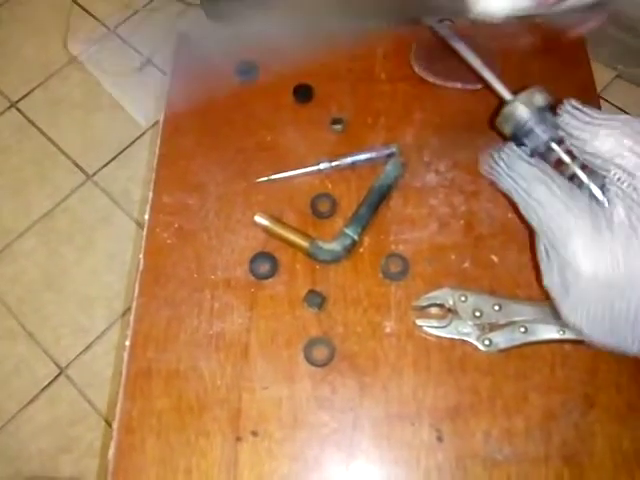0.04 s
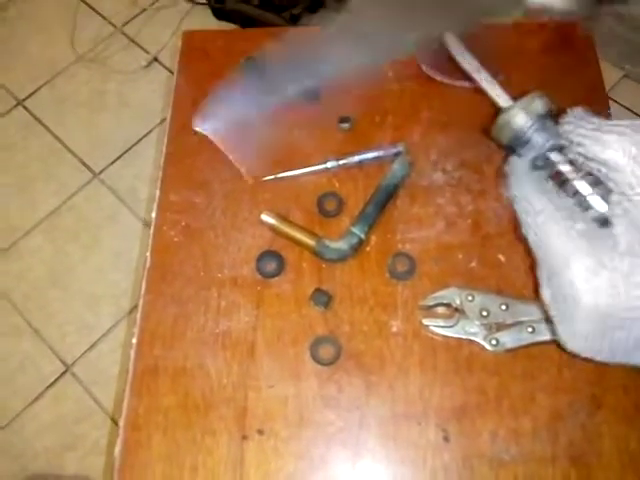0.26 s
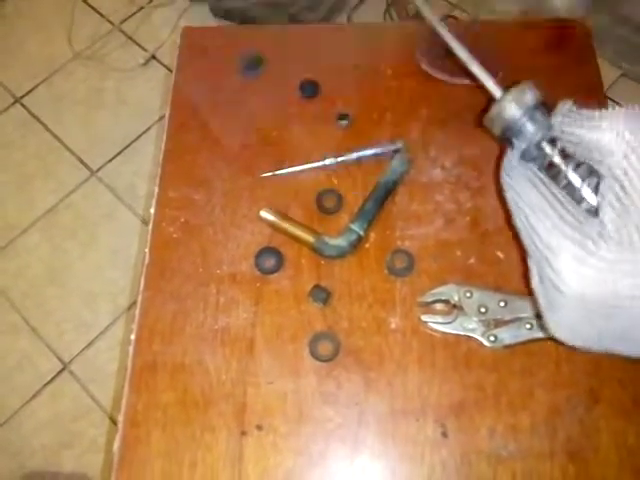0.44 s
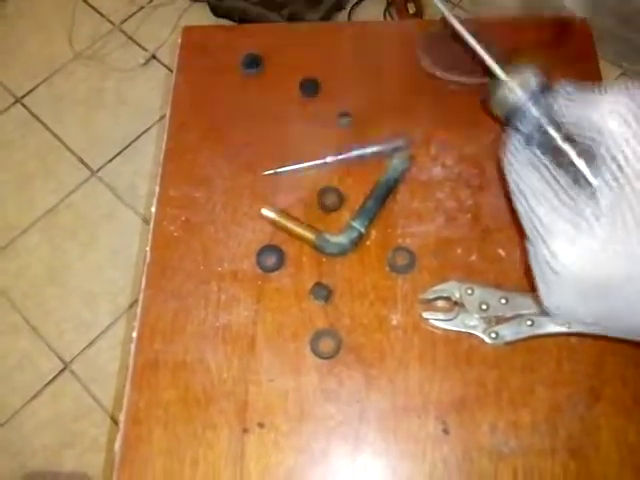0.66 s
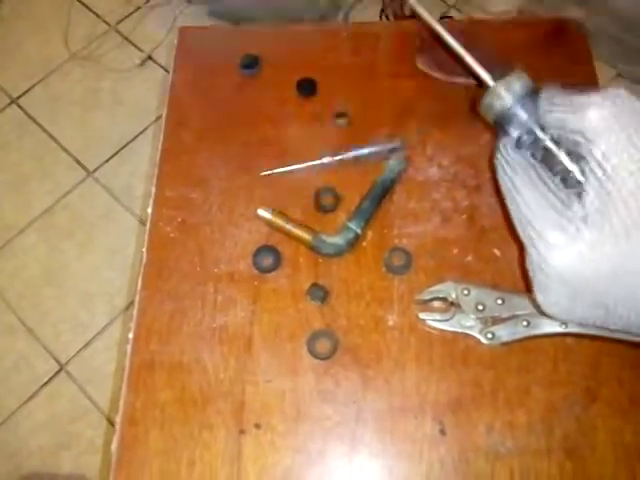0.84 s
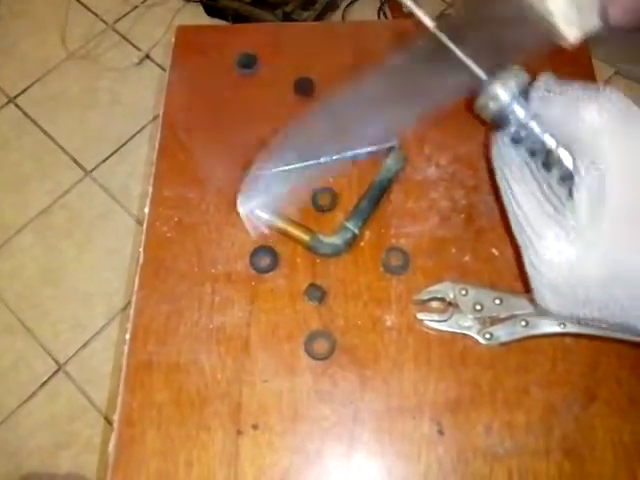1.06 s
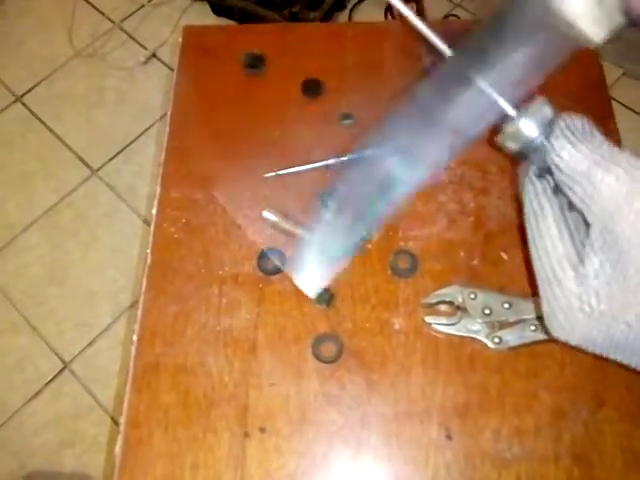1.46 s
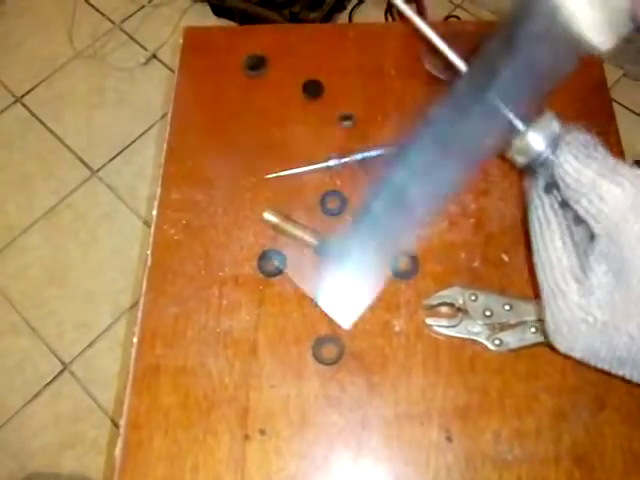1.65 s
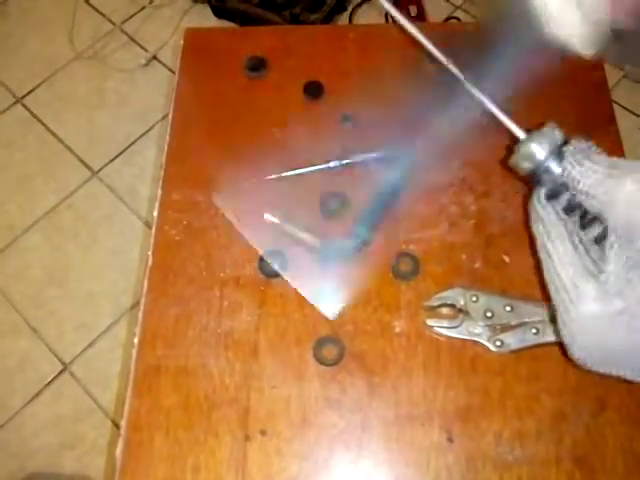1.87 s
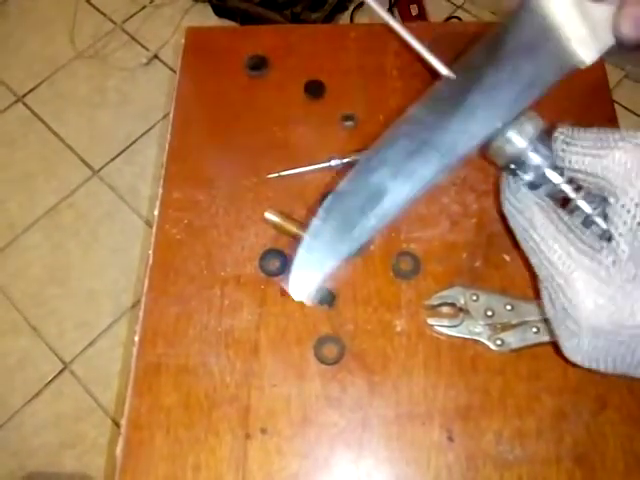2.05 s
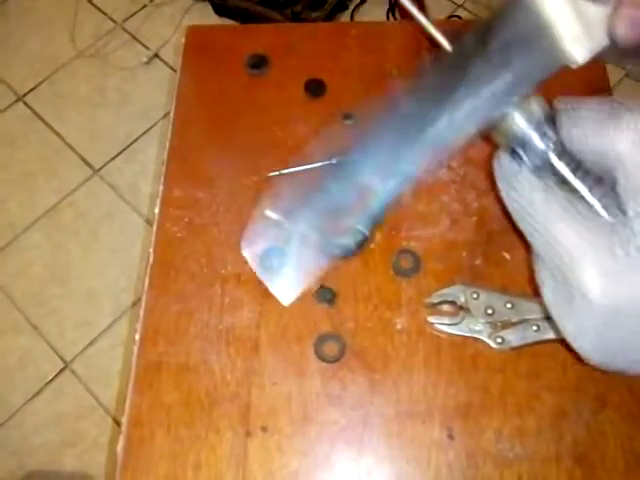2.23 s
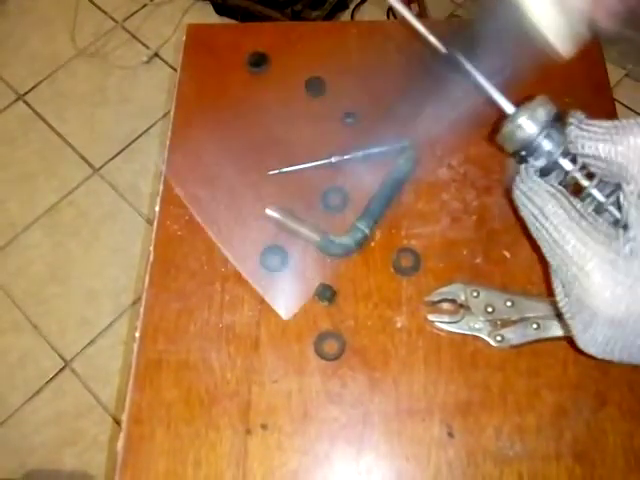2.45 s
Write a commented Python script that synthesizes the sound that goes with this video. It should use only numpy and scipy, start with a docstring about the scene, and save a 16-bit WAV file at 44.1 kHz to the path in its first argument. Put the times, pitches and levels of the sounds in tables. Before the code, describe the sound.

A metal blade scrapes back and forth along a steel rod in quick, bright, uneven strokes, starting softly at 0.1 seconds. The rasps carry ticks, faint squeaks and slight ringing, often ending in a knock. Hard clacks land at about 0.8 and 2.1 seconds, with a lighter one at 1.5, each briefly echoing in the hard-walled workshop. The strokes stop around 2.3 seconds, leaving a quiet background.

```python
"""A hard-walled workshop, one microphone: a long blade sweeps back and forth along a hand-held steel rod.
Each pass is a rasp of tiny slips through the blade's resonances, with faint squeaks, ticks where the
edge catches and often a knock at its end; light grazes leave the rod ringing. The table top reflects
the sound ahead of the room's tail, over a quiet background. The hardest clacks drive the recorder's
limiter down, so the room swells up after them."""
import sys
import numpy as np
from scipy import signal
from scipy.fft import rfft, irfft
from scipy.io import wavfile
from scipy.ndimage import uniform_filter1d, minimum_filter1d

SR = 44100
rng = np.random.default_rng(int(sys.argv[2]) if len(sys.argv) > 2 else 0)


def put_to_file(sound):
    """Save the sound as 16-bit audio at rate SR, in the file named by the first command-line argument."""
    columns = np.atleast_2d(sound).T  # one column per channel
    safe = np.clip(columns, -1, 1)
    whole_steps = np.round(safe * 32767)
    wavfile.write(sys.argv[1], SR, whole_steps.astype(np.int16))


N = 114660

# the blade's resonances: pitch_hz, height_db (against its colour), t60_s
BLADE_MODES = [(1880, 3, .1), (2805, -3, 0.048), (3090, -0.5, 0.03), (3757, 1, 0.023), (4020, 2, 0.036),
               (5310, -2, 0.056), (6120, 5.5, 0.023), (7030, 3.5, 0.045)]


def scrape(start_s, end_s, start_db, end_db, attack_s, slips_per_s=3900, release_s=.0024):
    """One pass: tiny slips, bunched by chatter, excite the blade as the contact slides along it."""
    t = np.arange(SR // 6) / SR
    length_s = max(end_s - start_s, .004)
    slips = (rng.random(len(t)) < slips_per_s / SR) * rng.choice([-1, 1], len(t))
    slips = slips * amp(3.5 * rng.standard_normal(len(t)).clip(-2, 2))  # uneven in strength
    slips *= amp(1.5 * wander(len(t), .0043 * SR))  # chatter
    slips *= amp(-1) / np.sqrt(np.mean(slips[t < length_s] ** 2) + 1e-9)
    contact = np.minimum(t / attack_s, 1) * np.exp(-np.maximum(t - length_s, 0) / release_s)
    pressure = contact * amp(np.interp(t, [0, length_s], [start_db, end_db]))
    force = slips * pressure
    travel = np.pi / 2 * np.minimum(t / length_s, 1)  # crossfade between two points of contact
    sound = signal.fftconvolve(force * np.cos(travel), blade_response(start_db))
    sound += signal.fftconvolve(force * np.sin(travel), blade_response(end_db))
    add(sound, 0, pressure * squeak(len(t)))
    return sound


def blade_response(level_db, neutral_db=-34.5, brightest_db=-22):
    """The blade's response at one point of contact; more pressure is brighter, up to a limit."""
    # the scraped blade's colour: frequency_hz, level_db
    blade_colour = [(100, -29), (800, -31.5), (1200, -22.5), (2200, -21), (3200, -11.5), (4000, -8.5),
                    (4450, -16), (5100, -5), (5800, -7), (6400, 0.5), (7250, -3.5), (8000, -13.5),
                    (8700, -16), (10000, -24), (13200, -29.5), (14100, -22.5), (14700, -19.5), (15500, -12)]
    tilt = .2545 * (min(level_db, brightest_db) - neutral_db)
    return ring(blade_colour, BLADE_MODES, ripple_db=3, tilt_db_per_octave=tilt)


def squeak(count, change_s=.012):
    """The slips lock into short, unsteady squeaks near the blade's resonances."""
    # squeak notes: pitch_hz, level_db (against the rasp)
    notes = [(3720, -16), (5310, -15), (6220, -8), (7030, -9)]
    sound = np.zeros(count)
    for hz, db in notes:
        gain = amp(db + 5 * wander(count, change_s * SR).clip(-2, 1.5))
        pitch_hz = hz * (1 + .012 * wander(count, 2 * change_s * SR))
        sound += gain * np.sin(2 * np.pi * np.cumsum(pitch_hz) / SR)
    return sound


def graze():
    """A light graze leaves the rod ringing freely, a little different each time."""
    # the rod's bending modes: pitch_hz, level_db, t60_s
    rod_modes = [(1238, -12, 0.11), (1841, -2.5, 0.073), (2335, -0.5, 0.051), (2790, -3, 0.054)]
    t = np.arange(SR // 3) / SR
    sound = np.zeros(len(t))
    for hz, db, t60 in rod_modes:
        strength, detune, phase = rng.standard_normal(3)
        envelope = amp(db + 2 * strength - 60 * t / t60)
        sound += envelope * np.sin(2 * np.pi * hz * (1 + detune / 150) * t + phase)
    return sound * (1 - np.exp(-t / .001))


def knock(level_db, body_db, thud_db):
    """The blade bumps at the end of a pass: a bright knock, a dull body and a low thud."""
    # the bright part's colour: frequency_hz, level_db
    knock_colour = [(200, -13), (800, -10.5), (1100, -1.5), (1600, -7), (2700, -1), (4200, -5.5),
                    (6300, -2), (8000, -12), (11000, -23.5), (15500, -33)]
    # the dull body's colour: frequency_hz, level_db
    body_colour = [(60, -13), (170, -17), (300, 0), (480, -4.5), (620, -1.5), (780, -16), (1100, -5),
                   (2200, -50), (8000, -36)]
    sound = amp(level_db) * blow(ring(knock_colour, BLADE_MODES, ripple_db=2), t60_s=.03, snap=.58)
    sound += amp(body_db) * blow(ring(body_colour), t60_s=.08, snap=.95)
    add(sound, .0017, amp(thud_db) * thud())
    return sound


def thud(pitch_hz=86, rise_s=.01, t60_s=.063):
    """The hands take the blow: one low, heavily damped swing."""
    t = np.arange(SR // 5) / SR
    envelope = (1 - np.exp(-t / rise_s)) ** 2 * amp(-60 * t / t60_s)
    swing = envelope * np.sin(2 * np.pi * pitch_hz * t)
    return swing / abs(swing).max()


def clack():
    """The blade strikes the rod hard: a very short, bright blow."""
    # the strike's colour: frequency_hz, level_db
    clack_colour = [(40, -52), (160, -40), (300, -27), (600, -18.5), (1100, -17), (2200, -6), (3800, -3),
                    (5000, 7), (6600, 5), (8000, -7.5), (10000, -22), (13500, -32), (15500, -29)]
    return blow(ring(clack_colour, BLADE_MODES), t60_s=.0078, snap=.89)


def blade_on_rod():
    """The direct sound at the microphone: rasps, ticks, grazes, knocks and clacks."""
    # passes of the edge: start_s, end_s, start_db, end_db, attack_s
    passes = [(.11, 0.191, -51.5, -48, .01), (0.185, 0.243, -47.5, -26.5, 0.0071),
              (0.311, 0.383, -39.5, -30.5, 0.0091), (0.404, 0.455, -31.5, -30, .002),
              (.553, 0.591, -28.5, -41.5, 0.00087), (0.599, 0.639, -33, -24, 0.015),
              (0.709, 0.736, -39, -36.5, 0.015), (.748, 0.797, -20.5, -51.5, 0.017),
              (0.791, 0.819, -38, -20.5, 0.021), (0.944, 0.95, -30, -17.5, 0.0058),
              (0.986, 1.015, -39, -18, 0.009), (1.107, 1.199, -39, -39, 0.013),
              (1.222, 1.277, -40.5, -50.5, 0.011), (1.274, 1.288, -40.5, -37.5, 0.0024),
              (1.299, 1.326, -23, -28.5, 0.0012), (1.385, 1.404, -43.5, -35, .003),
              (1.665, 1.693, -20, -25, 0.0025), (1.782, 1.838, -31, -32.5, 0.013),
              (1.845, 1.889, -29, -33.5, 0.004), (1.906, 1.959, -31.5, -25, 0.014),
              (2.026, 2.075, -32.5, -30.5, 0.0092), (2.094, 2.118, -29, -21.5, 0.0087),
              (2.23, 2.269, -15.5, -42.5, 0.013), (2.272, 2.297, -21.5, -28.5, 0.0046)]
    # the edge catches: start_s, level_db
    ticks = [(0.1073, -29), (.1815, -36.5), (0.2163, -48), (0.3308, -49), (0.346, -45), (.3655, -26),
             (0.4078, -22), (0.4436, -18), (0.5539, -20.5), (.5585, -26), (.628, -28), (0.8097, -26.5),
             (0.948, -14), (1.002, -16.5), (1.1295, -29), (1.18, -31), (1.277, -33), (1.2972, -19),
             (1.499, -3), (1.6666, -8.5), (1.682, -18.5), (1.797, -27), (1.8138, -43), (1.851, -19),
             (1.8728, -21), (1.924, -36), (1.937, -15.5), (2.0345, -27), (2.0535, -23.5), (2.066, -22.5),
             (2.1048, -46), (2.243, -24)]
    # light touches on the rod: start_s, level_db
    grazes = [(0.106, -43), (.263, -46), (.378, -46), (.555, -40.5), (.778, -56), (0.963, -35.5),
              (1.179, -40), (1.249, -44), (1.326, -44), (1.382, -45), (1.853, -35)]
    # bumps that end a pass: start_s, level_db, body_db, thud_db
    knocks = [(0.242, -33.5, -39.5, -58), (.443, -21.5, -34, -44), (0.639, -19.5, -31.5, -41),
              (0.9601, -18.5, -39, -61), (1.0207, -20.5, -30.5, -40), (1.325, -24, -32, -51),
              (1.502, -13, -25, -40), (1.6904, -18, -25, -41.5), (1.958, -23, -30.5, -44),
              (2.301, -18.5, -30.5, -42), (2.315, -28, -38, -52)]
    # hard strikes: start_s, level_db
    clacks = [(.833, 6), (1.5002, -9), (2.1276, 6)]
    out = np.zeros(N)
    for start_s, *stroke in passes:
        add(out, start_s, scrape(start_s, *stroke))
    for start_s, db in ticks:
        add(out, start_s, amp(db) * blow(blade_response(db), t60_s=.015, snap=.32))
    for start_s, db in grazes:
        add(out, start_s, amp(db) * graze())
    for start_s, *levels_db in knocks:
        add(out, start_s, knock(*levels_db))
    for start_s, db in clacks:
        add(out, start_s, amp(db) * clack())
    return out


def blow(response, t60_s, snap, size=8192):
    """A contact click of height snap and a quickly dying rattle excite a response."""
    t = np.arange(size) / SR
    rattle = rng.standard_normal(size) * amp(-60 * t / t60_s)
    force = rattle / np.linalg.norm(rattle)
    force[0] += snap
    for _ in range(2):  # even out the colour, keep the blow short
        flattened = irfft(np.exp(1j * np.angle(rfft(force))))
        force = flattened * np.exp(-(2 * t / t60_s) ** 2)
    sound = signal.fftconvolve(force, response)
    return sound / np.linalg.norm(sound) * np.sqrt(.003 * SR)  # the energy of 3 ms at rms 1


def ring(colour, modes=(), ripple_db=0, tilt_db_per_octave=0, size=16384):
    """A struck body's response, of energy 1: a tilted colour, narrow modes and random ripples."""
    hz = np.fft.rfftfreq(size, 1 / SR)
    peaks = 1 + sum(amp(db) ** 2 / (1 + ((hz - f) * t60 / 1.1) ** 2) for f, db, t60 in modes)
    slope_db = tilt_db_per_octave * np.log2(np.maximum(hz, 1000) / 6000)  # pivots at 6 kHz
    uneven_db = ripple_db * wander(len(hz), 262 / hz[1])  # ripples 262 Hz wide
    gain = amp(curve_at(colour, hz) + slope_db + uneven_db) * np.sqrt(peaks)
    # minimum phase: nothing sounds ahead of the contact
    cepstrum = irfft(np.log(gain))
    cepstrum[1:size // 2] *= 2
    cepstrum[size // 2 + 1:] = 0
    response = irfft(np.exp(rfft(cepstrum)))
    return response / np.linalg.norm(response)


def room(direct, tails=7, turn_s=.11):
    """The moving blade sends its sound down changing paths: several tails take turns."""
    turn = np.arange(N) / SR / turn_s
    shares = (np.sin(np.pi / 2 * np.minimum((turn - k) % tails, 2)) for k in range(tails))
    return sum(signal.fftconvolve(direct * share, room_tail())[:N] for share in shares)


def room_tail(rise_s=.0048):
    """The hard walls return a dense tail in which the midrange lasts longest."""
    # the room's decay: frequency_hz, t60_s
    decay = [(100, 0.35), (400, .5), (1500, .5), (4000, 0.364), (6500, 0.4048), (10000, 0.25), (15000, 0.4)]
    # the tail's strength: frequency_hz, level_db
    strength = [(100, -5), (400, -7), (1500, -5.5), (4000, -4.5), (6500, -9), (10000, -4.5), (15000, -10)]
    hz, t, bands = signal.stft(rng.standard_normal(SR), SR, nperseg=256)
    t60 = curve_at(decay, hz)[:, None]
    bands *= amp(curve_at(strength, hz)[:, None] - 60 * t / t60)
    bands *= np.sqrt(2 * np.log(1000) / (t60 * SR))  # a longer decay adds no energy
    tail = signal.istft(bands, SR, nperseg=256)[1][:SR]
    return tail * (1 - np.exp(-np.arange(SR) / SR / rise_s))


def room_tone(level_db=-60.5):
    """The workshop's quiet background: a low, steady noise with a faint hiss."""
    # the background's colour: frequency_hz, level_db
    air_colour = [(20, -33.5), (45, -42), (85, 0), (150, 1), (330, -1), (700, -15), (2000, -24),
                  (6000, -17), (9000, -34), (15500, -62)]
    gain = amp(curve_at(air_colour, np.fft.rfftfreq(N, 1 / SR)))
    noise = irfft(rfft(rng.standard_normal(N)) * gain, N)
    return amp(level_db) * noise / np.sqrt(np.mean(noise ** 2))


def amp(db):
    """Decibels to gain."""
    return 10 ** (np.asarray(db) / 20)


def curve_at(points, hz):
    """Interpolates a table on a log-frequency axis."""
    points_hz, values = np.transpose(points)
    return np.interp(np.log(hz + 1), np.log(points_hz + 1), values)


def add(mix, start_s, sound):
    """Mixes a sound in at a time."""
    part = mix[max(round(start_s * SR), 0):][:len(sound)]
    part += sound[:len(part)]


def wander(count, span):
    """A random drift of spread about 1 that takes a new course every span steps."""
    position = np.arange(count) / max(span, 1)
    return 1.2 * np.interp(position, np.arange(1024), rng.standard_normal(1024))


def scene():
    """At the microphone: blade and rod, the table's reflection, the room and its background."""
    steel = blade_on_rod()
    out = steel + room(steel) + room_tone()
    add(out, .0047, amp(-15.5) * steel)  # off the table top, a path 1.6 m longer
    return out[None]


def record(dry, limit_db=-13, look_ahead_s=.0013, recover_s=.057, cutoff_hz=15550):
    """The recorder's look-ahead limiter ducks at once and recovers smoothly; then clip and band limit."""
    level_db = 10 * np.log10(abs(uniform_filter1d(dry[0] ** 2, size=128)) + 1e-12)
    over_db = np.maximum(level_db - limit_db, 1e-6)
    held_db = -minimum_filter1d(-over_db, 2 * int(look_ahead_s * SR / 2) + 1)
    fall = np.arange(N) / SR / recover_s
    duck_db = np.exp(np.maximum.accumulate(np.log(held_db) + fall) - fall)  # each peak decays away
    limited = np.clip(dry * amp(-uniform_filter1d(duck_db, size=64)), -1, 1)
    lowpass = signal.firwin(1023, cutoff_hz, window=("kaiser", 9), fs=SR)
    return signal.oaconvolve(limited, lowpass[None], "same")


dry = scene()
out = record(dry)
put_to_file(out)
```